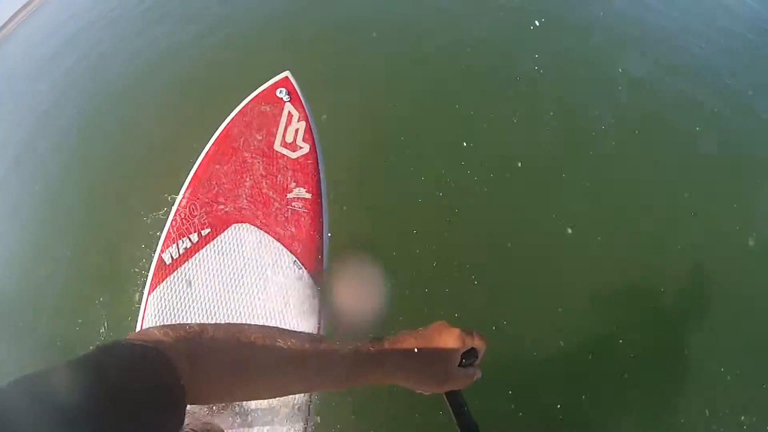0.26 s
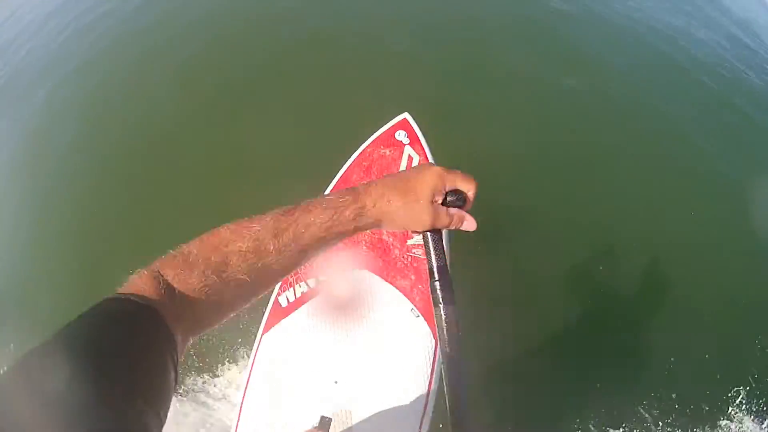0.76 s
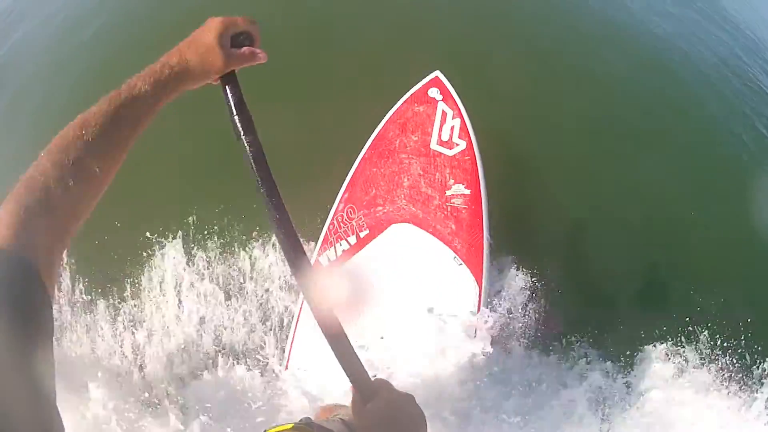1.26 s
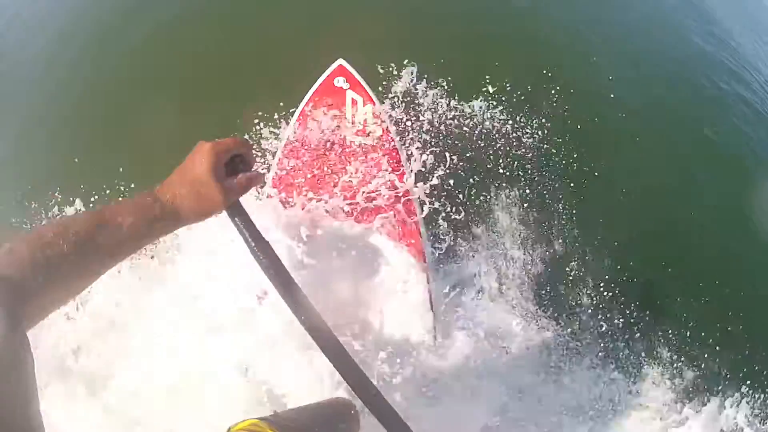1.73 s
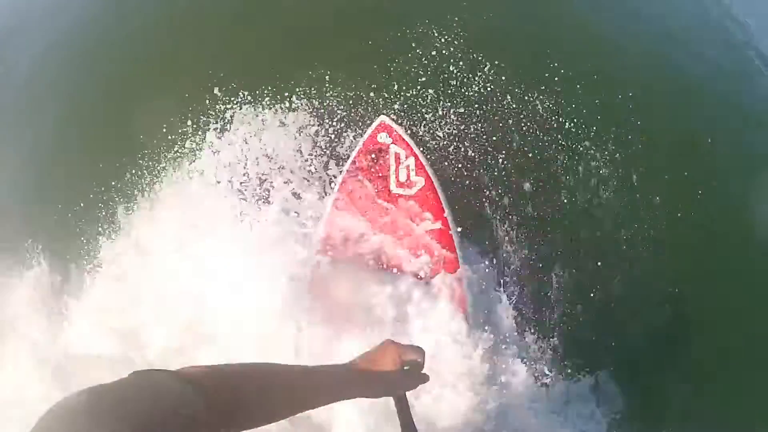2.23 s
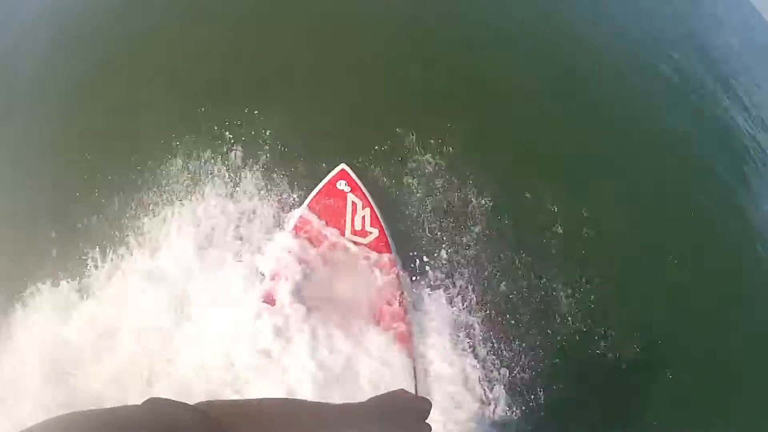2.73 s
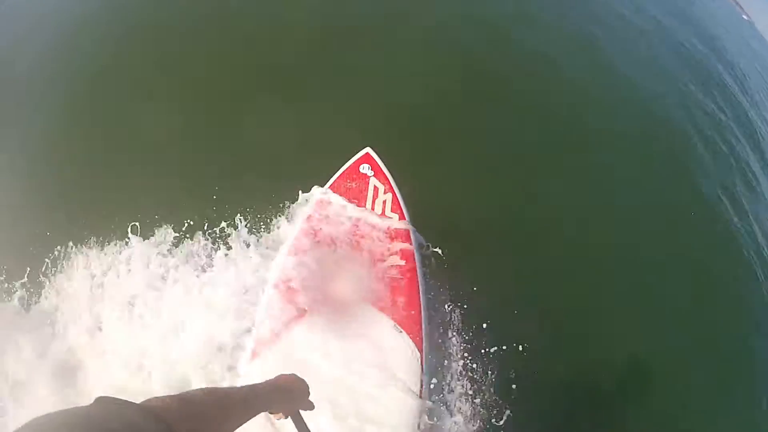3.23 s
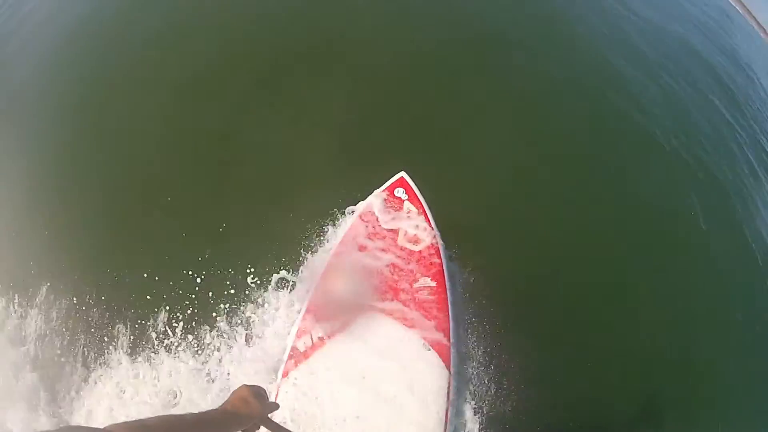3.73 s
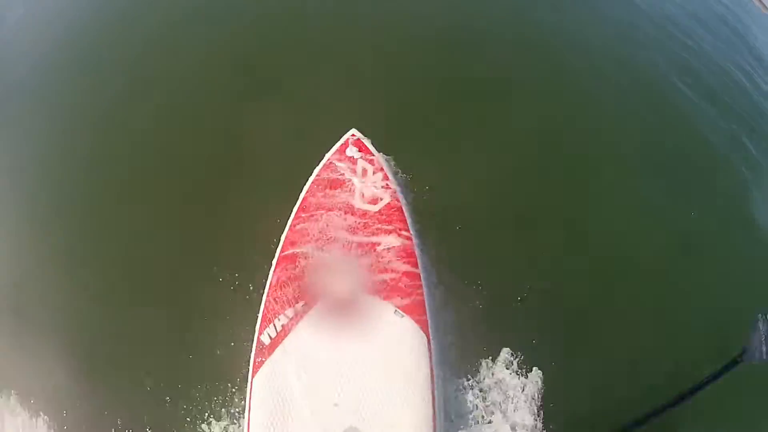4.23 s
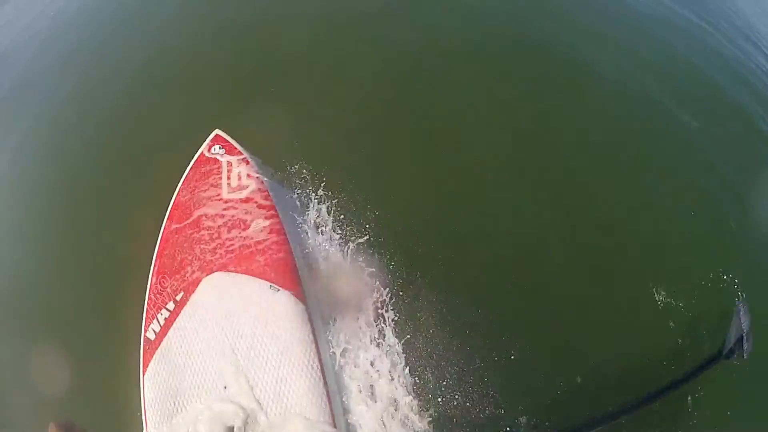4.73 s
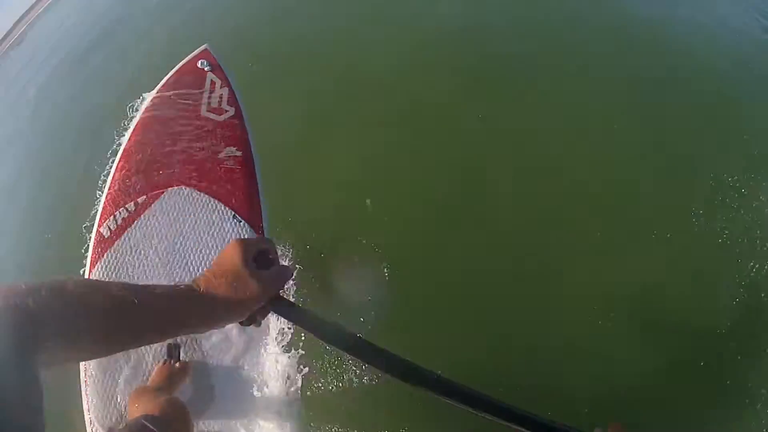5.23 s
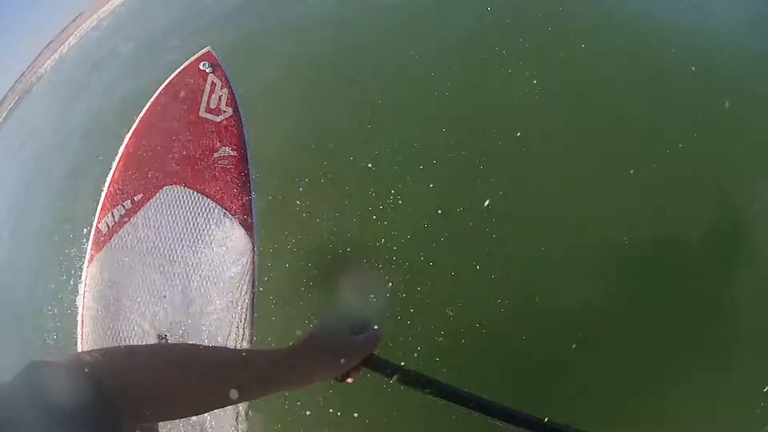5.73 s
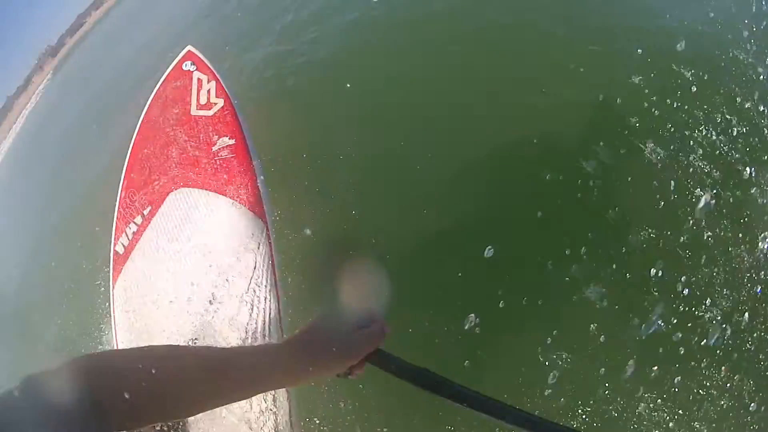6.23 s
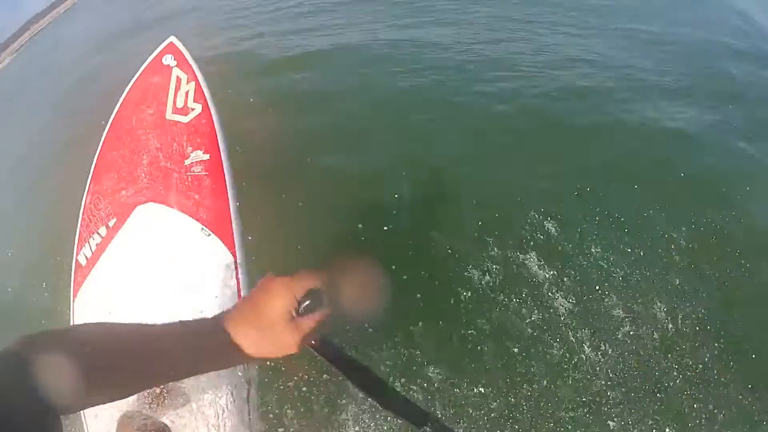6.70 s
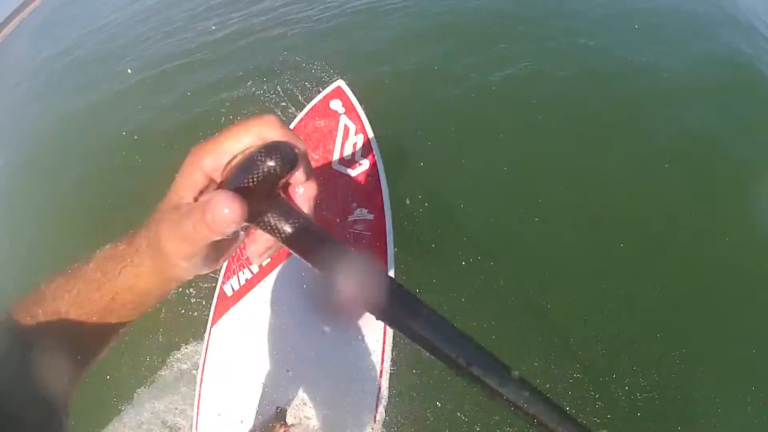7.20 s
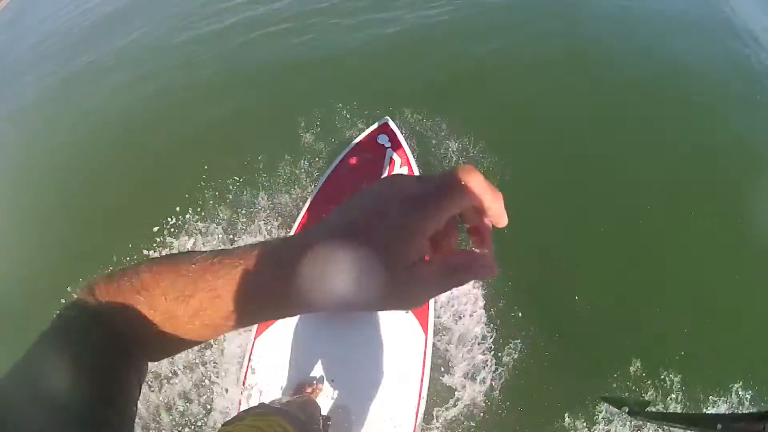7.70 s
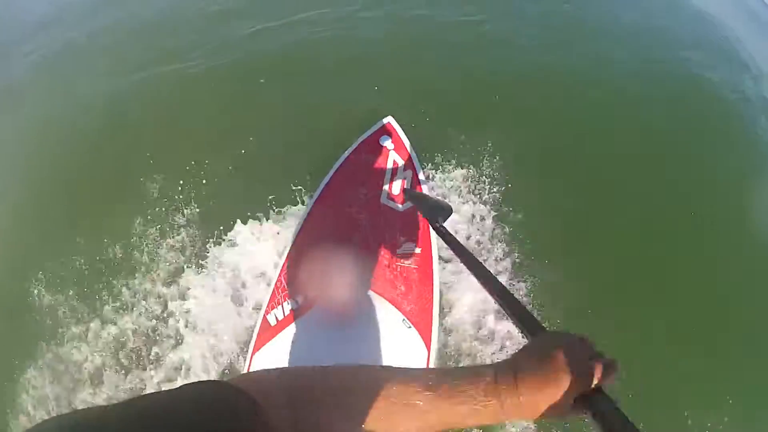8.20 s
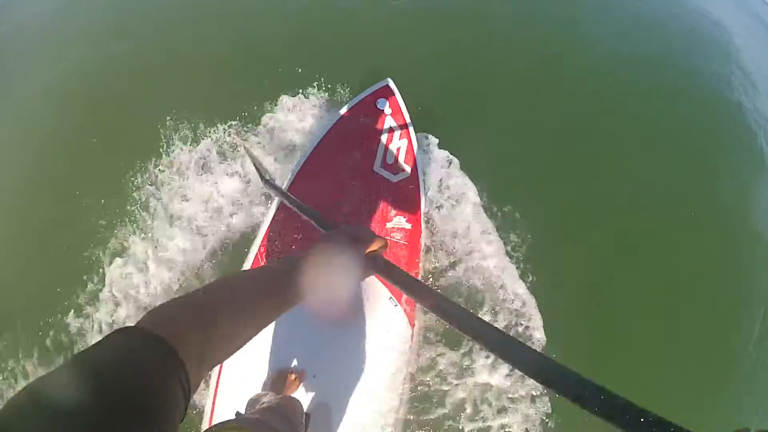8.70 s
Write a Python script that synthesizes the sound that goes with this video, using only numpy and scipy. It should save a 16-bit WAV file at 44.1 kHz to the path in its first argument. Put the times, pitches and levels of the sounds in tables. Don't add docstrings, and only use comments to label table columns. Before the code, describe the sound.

Muffled, grainy rush of slowed-down water spray under a surfboard, with deep wind rumble, low jolts and scattered hollow drop taps on the microphone case.

```python
import sys
import numpy as np
from scipy import signal
from scipy.fft import rfft, irfft, next_fast_len
from scipy.io import wavfile
from scipy.ndimage import uniform_filter1d

SR = 44100
rng = np.random.default_rng(int(sys.argv[2]) if len(sys.argv) > 2 else 0)


def decibels_to_gain(level_db):
    exponent = np.asarray(level_db, float) / 20
    return 10 ** exponent


def digitize_waveform(pressure):
    field = np.atleast_2d(pressure).T
    bounded = np.clip(field, -1, 1)
    quanta = np.round(bounded * 32767).astype(np.int16)
    wavfile.write(sys.argv[1], SR, quanta)


N = 394685


def rms_one(x):
    return x / np.sqrt(np.mean(x ** 2) + 1e-20)


def in_time(rows):
    s, *columns = np.transpose(rows)
    return [np.interp(np.arange(N) / SR, s, column) for column in columns]


def drift(rate_hz):
    pole = np.exp(-80 * np.pi * rate_hz / SR)
    noise = rng.standard_normal(N // 40 + 2002)
    slow = signal.lfilter([1], [1, -2 * pole, pole * pole], noise)[2000:]
    return np.interp(np.arange(N) / 40, np.arange(len(slow)), rms_one(slow))


def coloured(x, spectrum, low_hz, high_hz):
    size = next_fast_len(N)
    hz = np.maximum(np.arange(size // 2 + 1) * SR / size, 1)
    points_hz, points_db = np.transpose(spectrum)
    edges = 1 / np.sqrt((1 + (low_hz / hz) ** 24) * (1 + (hz / high_hz) ** 24))
    gain = decibels_to_gain(np.interp(np.log(hz), np.log(points_hz), points_db)) * edges
    return rms_one(irfft(rfft(x, size) * gain, size)[:N])


# (frequency [Hz], spectral density [dB per Hz])
HOUSING_SPECTRUM = [(190, -43), (330, -4.5), (540, -5), (640, -2), (790, -2.5), (1080, -2), (1190, -3),
                    (1340, 2.5), (1420, 0.8), (1560, -3), (1740, -5.5), (2050, -5.5), (2250, -7.5),
                    (2420, -12)]
# (frequency [Hz], width [Hz], depth [0-1])
HOUSING_NOTCHES = [(898, 205, 0.67), (1675, 176, 0.55)]
# (low edge [Hz], high edge [Hz])
SPRAY_BANDS = [(300, 900), (900, 1670), (1670, 2400)]
# (time [s], level [dB], fineness, mist over heavy splash [dB])
FLOW_CURVE = [(0.0, -44.5, 2), (0.35, -45, 0.8), (0.8, -43.5, -0.1), (1.27, -42.5, -.2),
              (1.45, -46.5, -1.6), (2.42, -46.5, .3), (2.76, -48.5, -0.2), (4.66, -48, -1.1),
              (4.93, -51, -1.9), (5.3, -51.5, .6), (5.75, -50.5, -0.5), (6.2, -48.5, 1.8),
              (6.55, -47.5, 1.6), (7.05, -52.5, -.3), (7.7, -49, 3.5), (8.0, -53, 0.5), (8.15, -56, 0.8),
              (8.95, -57, .5)]
COARSE_DB, MIST_DB = -4, -10.5
COARSE_LOSS, MIST_GAIN = 0.9, 0.81


def spray():
    hiss_db, fineness = in_time(FLOW_CURVE)
    coarse_db = hiss_db + COARSE_DB - COARSE_LOSS * fineness
    mist_db = hiss_db + MIST_DB + MIST_GAIN * fineness
    rain = droplets(per_s=2500, spread_db=1.2)
    together_db = 0.22 * drift(26)
    foam = np.diff(bubbles(per_s=300, cycles=70), prepend=0)
    rain = rms_one(rain) + decibels_to_gain(0.5) * foam
    for hz, width_hz, depth in HOUSING_NOTCHES:
        rain = rain - depth * signal.lfilter(*signal.iirpeak(hz, hz / width_hz, SR), rain)
    out = 0
    for level_db, (low_hz, high_hz) in zip((coarse_db, hiss_db, mist_db), SPRAY_BANDS):
        gain = decibels_to_gain(level_db + 0.44 + together_db + 0.11 * drift(36))
        out = out + gain * coloured(rain, HOUSING_SPECTRUM, low_hz, high_hz)
    return out


def droplets(per_s, spread_db):
    sizes = decibels_to_gain(spread_db * np.minimum(rng.exponential(1, N), 5)) * rng.choice([-1, 1], N)
    impacts = sizes * (rng.random(N) < per_s / SR)
    return rms_one(impacts) + 0.88 * rng.standard_normal(N)


def bubbles(per_s, cycles):
    born = np.flatnonzero(rng.random(N) < per_s * decibels_to_gain(0.8 * drift(9)) / SR)
    pitch, size = rng.random((N, 2))[born].T
    t = np.arange(SR // 12) / SR
    out = np.zeros(N + SR)
    for at, hz, db in zip(born, 450 * 3.6 ** pitch, 7 * size):
        turns = hz * t * (1 + 3.0 * t)
        envelope = decibels_to_gain(db - 60 * turns / cycles) * (1 - np.exp(-turns / 1.2))
        out[at:at + len(t)] += envelope * np.sin(2 * np.pi * turns)
    return rms_one(out[:N])


# (time [s], peak level [dB], brightness [dB per octave],
# hollowness, outer modes over middle ones [dB per octave squared])
DROP_HITS = [(2.513, -37.5, 3, -5), (2.618, -37.5, 5, -2), (5.491, -38, 12.5, -2.5), (5.644, -42, 0, -5),
             (5.99, -45, 19, -6), (6.208, -55, -12.5, 3), (6.2458, -33.5, -4, -1), (6.354, -47.5, -7, -5),
             (7.0393, -40, -0.5, -3.5), (7.109, -44.5, 16.5, 4), (7.228, -41, 1, 1.5),
             (7.638, -42.5, 16.5, -2.5), (7.789, -45, 0, -10), (8.445, -47, 16, -8), (8.572, -47.5, 4, -8),
             (8.714, -56, -1, -1), (8.787, -47, 15, -12)]
# (frequency [Hz], level [dB], decay time t60 [s])
WALL_MODES = [(475, 15.5, 0.017), (800, 10.5, 0.016), (1090, 9, 0.018), (1430, 2.5, 0.019),
              (1767, 0, 0.011)]
WALL_MIDDLE_HZ = 900


def drops():
    out = np.zeros(N + SR)
    for s, db, bright_db, hollow_db in DROP_HITS:
        start = round(s * SR)
        for k, (hz, mode_db, t60) in enumerate(WALL_MODES):
            octave = np.log2(hz / WALL_MIDDLE_HZ)
            level_db = db + mode_db + bright_db * octave + hollow_db * octave ** 2
            mode = ring(level_db, hz, t60, rise_s=0.001)
            out[start:start + len(mode)] -= (-1) ** k * mode
    no_bass = signal.butter(3, 290, "high", fs=SR, output="sos")
    return signal.sosfilt(no_bass, out[:N])


def ring(db, hz, t60, rise_s):
    t = np.arange(SR * 6 // 100) / SR
    return decibels_to_gain(db - 60 * t / t60) * (1 - np.exp(-t / rise_s)) ** 2 * np.sin(2 * np.pi * hz * t)


# (frequency [Hz], width [Hz], level [dB])
GURGLE_MODES = [(810, 37, -57), (1263, 19, -48.5), (1800, 50, -67)]
GURGLE_S, GURGLE_LENGTH_S = 8.86, 0.077


def gurgle():
    swell = np.sin(np.pi * np.clip((np.arange(N) / SR - GURGLE_S) / GURGLE_LENGTH_S, 0, 1))
    noise = rng.standard_normal(N)
    out = 0
    for hz, width_hz, db in GURGLE_MODES:
        whistle = signal.lfilter(*signal.iirpeak(hz, hz / width_hz, SR), noise)
        out = out + decibels_to_gain(db) * rms_one(whistle)
    return swell * out


# (time [s], peak level [dB], frequency [Hz], length [swings])
JOLT_EVENTS = [
    (1.08, -16.5, 17.7, 2.25),
    (1.24, -34.5, 85.5, 9.5),
    (2.555, -27, 10.5, 0.87),
    (3.851, -37.5, 53, 6.9),
    (4.3, -39, 53, 4.6),
    (6.241, -31.5, 44.6, 4.8),
    (7.344, -26.5, 28, 3),
    (7.735, -16.5, 22, 1.34),
]


def jolts():
    out = 0
    for s, db, hz, swings in JOLT_EVENTS:
        turn = np.clip((np.arange(N) / SR - s) * hz, 0, swings)
        swell = np.sin(np.pi * turn / swings) ** 2
        out = out - decibels_to_gain(db) * swell * np.sin(2 * np.pi * turn)
    return out


# (frequency [Hz], spectral density [dB per Hz])
DEEP_SPECTRUM = [(1.8, -35.5), (3.0, 2.5), (16, 6), (24, -3.5), (34, 3), (75, -15.5), (173, -20),
                 (313, -28.5), (400, -43), (520, -60), (880, -120)]
# (low edge [Hz], high edge [Hz])
LOW_BANDS = [(2, 24), (24, 70), (70, 340)]
WASH_DB, WASH_LOSS = -0.33, 0.9


def wind_and_wash():
    flow_db, fineness = in_time(FLOW_CURVE)
    wash = decibels_to_gain(flow_db + WASH_DB - WASH_LOSS * fineness)
    noise = rng.standard_normal(N)
    out = 0
    for gain, (low_hz, high_hz) in zip((*gusts(), wash), LOW_BANDS):
        band = coloured(noise, DEEP_SPECTRUM, low_hz, high_hz)
        own_swell = np.sqrt(uniform_filter1d(band ** 2, size=SR // 10) + 0.15)
        out = out + gain * band / own_swell
    return out


# (centre time [s], length [s], rumble level [dB], buffeting re rumble [dB])
GUST_EVENTS = [(.07, 0.1, -46, -14), (0.418, .2, -40, -13), (.84, 0.21, -40, -8), (1.004, 0.1, -32, -6),
               (1.15, 0.33, -37.5, 1), (1.297, 0.127, -45, 3), (1.42, 0.19, -36, -7),
               (1.745, 0.32, -50, -2.5), (2.257, 0.29, -42, -8), (2.5, 0.21, -42, -11),
               (2.803, 0.1, -51, -5), (3.0, 0.33, -57, 0), (3.297, 0.082, -45, -13), (3.9, 0.21, -55, -6),
               (4.129, 0.065, -35, -9), (4.353, 0.27, -40, -2), (4.71, 0.22, -47, -1), (4.945, .12, -49, 8),
               (5.146, 0.67, -39, -13), (5.516, 0.22, -37, -23), (5.773, 0.23, -33, -15),
               (6.203, 0.29, -33.5, -15), (6.36, 0.22, -31.5, -12), (6.615, 0.15, -39, -13),
               (6.833, 0.41, -43, -9), (7.12, 0.13, -37.5, -16), (7.424, 0.22, -30.5, -16),
               (7.58, 0.14, -41, -1.5), (7.8, 0.15, -40, 1), (7.982, 0.1, -37.5, -24)]
CALM_RUMBLE_DB, CALM_BUFFET_DB = -44, -2
BUFFET_FOLLOWS = 0.6
PUFFS_FROM_S, PUFF_GAP_S, PUFF_S, PUFF_DB, PUFF_BUFFET_DB = 8.24, 0.302, 0.21, -42.5, -15


def gusts():
    flow_db, t = in_time(FLOW_CURVE)[0], np.arange(N) / SR
    mean_db = flow_db.mean()
    rumble = np.full(N, decibels_to_gain(CALM_RUMBLE_DB))
    buffet = decibels_to_gain(mean_db + CALM_BUFFET_DB + BUFFET_FOLLOWS * (flow_db - mean_db))
    puffs = [(PUFFS_FROM_S + k * PUFF_GAP_S, PUFF_S, PUFF_DB, PUFF_BUFFET_DB) for k in range(3)]
    for s, length_s, db, buffet_db in GUST_EVENTS + puffs:
        swell = np.cos(np.pi * np.clip((t - s) / length_s, -0.5, 0.5)) ** 2
        rumble = rumble + decibels_to_gain(db) * swell
        buffet = buffet + decibels_to_gain(db + buffet_db) * swell
    return rumble, buffet


def scene():
    return (spray() + wind_and_wash() + drops() + gurgle() + jolts())[None]


def band_limit(x):
    return signal.sosfilt(signal.butter(12, 9250, fs=SR, output="sos"), x)


def record(dry):
    slow = signal.resample_poly(dry, 16, 147, axis=1)
    held = np.repeat(slow, 10, axis=1)
    held = signal.resample_poly(held, 147, 160, axis=1)[:, :N]
    top_cut = signal.cheby2(10, 50, 9920, fs=SR, output="sos")
    mix = signal.sosfilt(top_cut, held)
    return band_limit(mix)


dry = scene()
out = record(dry)
digitize_waveform(out)
```